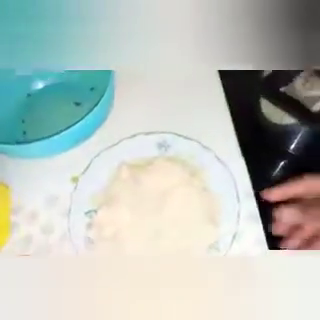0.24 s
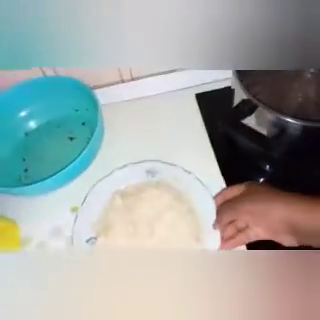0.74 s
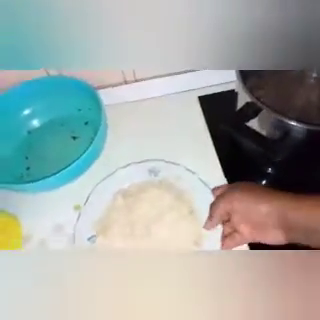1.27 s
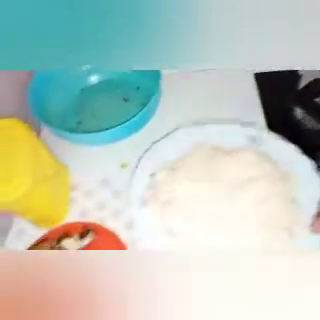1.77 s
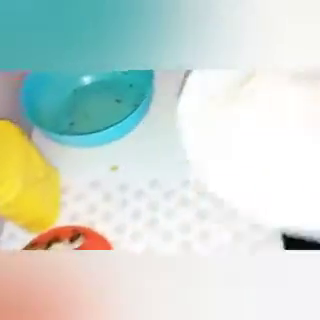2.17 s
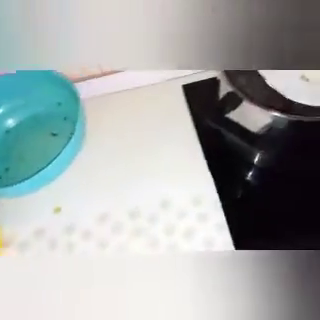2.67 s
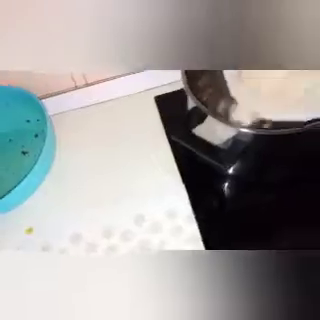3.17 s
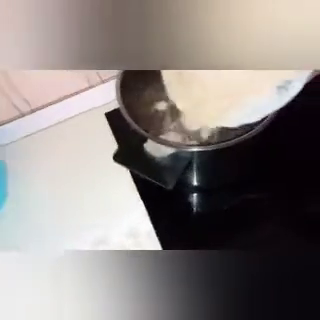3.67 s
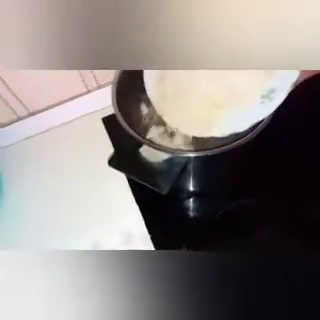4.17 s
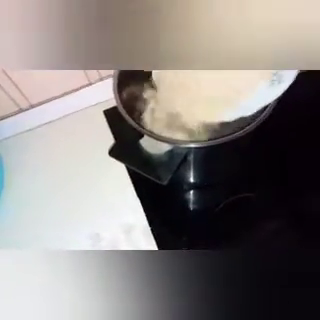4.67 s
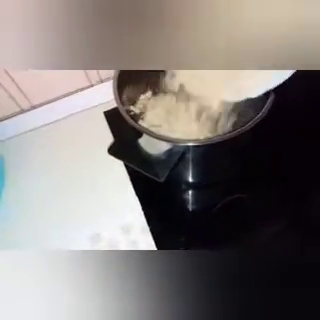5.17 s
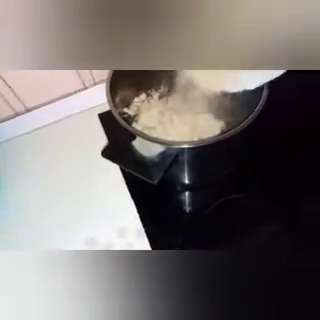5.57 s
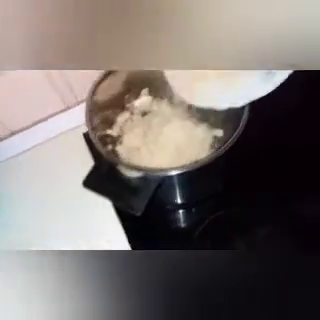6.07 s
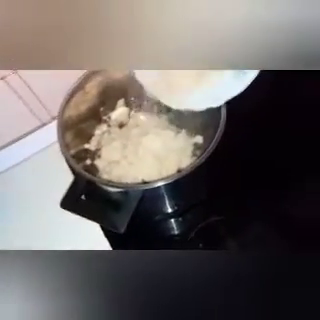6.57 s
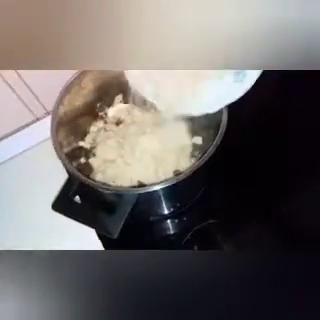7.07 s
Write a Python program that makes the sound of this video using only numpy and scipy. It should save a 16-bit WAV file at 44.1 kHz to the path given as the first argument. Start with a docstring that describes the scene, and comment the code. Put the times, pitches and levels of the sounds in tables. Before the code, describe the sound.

A steel pot simmers on a hob with a low rumble, soft gurgling, fizz and small crackles of fat, while single bubbles pop. After about three seconds a plate clinks sharply against the rim several times, drags along it in short hissing rubs, then knocks again in a quick uneven run. Each contact rings briefly over a dull thump. The sound is mono, with the short echo of a small kitchen.

```python
"""A small kitchen, where a steel pot simmers on a faintly humming hob. The simmer rumbles, gurgles
and fizzes; small bubbles ring, fat crackles and single bubbles burst. A plate of ground seed is held
over the pot and knocked and shaken against the rim: each chattering contact sets plate and pot
ringing, thumps the hob below and leaves a lingering noisy wash, while each shake drags the plate
along the rim with a hiss. Knocks, rubs and pops carry a short room tail."""
import sys
import numpy as np
from scipy import signal
from scipy.fft import rfft, irfft
from scipy.io import wavfile

SR = 44100
rng = np.random.default_rng(int(sys.argv[2]) if len(sys.argv) > 2 else 0)


def store_pcm(level_fs):
    """Save levels as 16-bit WAV."""
    pcm = np.round(np.clip(level_fs, -1, 1) * 32767).astype(np.int16)
    wavfile.write(sys.argv[1], SR, np.atleast_2d(pcm).T)


N = 323253

# tone of the simmer: f/Hz, level/dB
SIMMER_SPECTRUM = [(18, -62), (30, -19.5), (134, 13.5), (239, -8.5), (540, -11), (844, -19.5),
                   (1160, -18.5), (1590, -27.5), (1760, -23.5), (2230, -21.5), (4910, -21.5), (6720, -30),
                   (16000, -41.5)]
# air resonances in the hollow of the pot: f/Hz, rough width/Hz, level/dB
POT_AIR_MODES = [(97, 41, 2.5), (535.6, 20, -11), (698, 120, -19), (1133.4, 25, -15)]
# plate on rim: t/s, level/dB, plate pitch/Hz, then relative to that level pot ring/dB, plate ring/dB,
# hollow knock/dB, hob thump/dB; last, contact time/s
RIM_KNOCKS = [(2.996, 2.5, 3602, -17.5, -24.5, -16.5, -17.5, 0.0065),
              (3.179, -5.5, 3540, -12, -20, -12, -19, 0.012),
              (3.2, -9.5, 3640, -13, -22, -22, -17.5, 0.006),
              (3.37, -9, 3470, -15, -30, -11.5, -20.5, 0.013),
              (3.394, -3.5, 3535, -16, -26, -18, -19, 0.0019),
              (3.589, -19, 3420, -24, -19, -24, -12.5, 0.0058),
              (3.61, -4.5, 3700, -13, -30, -11.5, -20.5, 0.0054),
              (3.663, -13.5, 3640, -9, -21, -9, -14, .007),
              (3.753, -21, 3530, -10.5, -14.5, -15, -12.5, 0.011),
              (3.85, -4, 3730, -11, -14, -15.5, -20.5, 0.0064), (4.15, -32, 3690, -8, -11, -7, -10, 0.0053),
              (4.636, -35.5, 3670, 3, -12, 8, 3, 0.0047), (4.741, -26.5, 3550, -4.5, -13, -8, -12, .0041),
              (4.865, -30.5, 3370, -13, -25, -25, -9.5, 0.0096),
              (4.89, -32.5, 3560, -3, -20, -6, -9.5, 0.0038),
              (5.079, -25.5, 3590, -33, -18, -10, -8.5, .0073),
              (5.327, -16.5, 3475, -7.5, -19, -0.5, -13, 0.0028),
              (5.391, -33.5, 3660, -11, -16, -7, -10, 0.0086),
              (5.462, -12, 3540, -15, -15.5, -14, -16.5, 0.0072),
              (5.635, -13, 3380, -19, -34, -6, -17.5, 0.0071),
              (5.935, -8, 3730, -16.5, -32, -4, -16.5, 0.015),
              (5.961, -15.5, 3800, -14, -41, 1, -16, 0.0052), (5.984, -34, 3680, -23, -35, 11.5, 1, 0.0028),
              (6.103, -21.5, 3770, -7, -29, 2, -12, 0.0018),
              (6.169, -13.5, 3540, -20, -14.5, -22, -13, .009),
              (6.201, -14, 3660, -14.5, -26.5, 0.5, -17.5, 0.0019),
              (6.284, -25.5, 3750, -35, -23, -25, -38, 0.0048),
              (6.317, -10, 3660, -13.5, -18.5, -24.5, -15, 0.008),
              (6.404, -10, 3740, -17, -30, -5.5, -15.5, .0084),
              (6.464, -21, 3630, -7, -32, -2.5, -14, 0.0059),
              (6.505, -12, 3700, -16, -15.5, -18, -16.5, 0.009),
              (6.634, -2.5, 3755, -12.5, -34, -60, -18.5, 0.012),
              (6.881, -2, 3670, -22, -21.5, -17, -24, 0.012), (6.922, -17, 3400, -18, -22, -22, -14, 0.011),
              (7.202, -32, 3300, -19, -31, -26, -6, 0.005),
              (7.285, -30, 3800, -39, -28, -4.5, -6.5, 0.0041)]
# modes of plate, steel pot and hob: f/Hz, level/dB, t60/s
PLATE_MODES = [(1677, 5.5, 0.041), (2504, -2.5, 0.025), (3540, 8.5, 0.061), (4700, -2, 0.06),
               (5650, -43, 0.18), (7130, -7, 0.034)]
POT_MODES = [(751, -19, 0.21), (902.6, -7.5, 0.09), (1041, -6.5, 0.1), (1092, 8, 0.023),
             (1547, -8.5, 0.059), (1669, -5, 0.068), (2220, -20, 0.16), (2590, -4, 0.07),
             (2984, -13.5, 0.063), (4637, -4.5, 0.053), (5140, -14, 0.061), (6280, -13, 0.044),
             (6040, -19, 0.12), (7000, -41, 0.068), (7697, -11.5, 0.043), (8100, -11, 0.043),
             (8890, -14.5, 0.051), (10440, -19.5, 0.043), (12030, -27, 0.09), (13850, -24.5, 0.053)]
HOB_MODES = [(95.5, -3, 0.25), (140.4, -6, 0.19), (198, -8.5, 0.068), (292.8, -2, 0.1),
             (335.5, -22.5, 0.15), (403, -5, 0.098), (538.5, -9.5, 0.14)]


def from_db(db):
    """Decibels to gain."""
    return 10 ** (np.asarray(db) / 20)


def unit_rms(x):
    """Scale to rms 1."""
    return x / np.sqrt(np.mean(x ** 2) + 1e-20)


def unit_peak(x):
    """Scale to peak 1."""
    return x / np.max(np.abs(x))


def automation(points):
    """A breakpoint curve, sample by sample."""
    return np.interp(np.arange(N) / SR, *np.transpose(points))


def at_hz(points, hz):
    """Read a curve on a log-frequency axis."""
    freqs, values = np.transpose(points)
    return np.interp(np.log(hz), np.log(freqs), values)


def add(out, start_s, x):
    """Mix x in at its cue."""
    i = round(start_s * SR)
    out[i:i + len(x)] += x[:N - i]


def butter(x, order, hz, kind):
    """Butterworth filter."""
    return signal.sosfilt(signal.butter(order, hz, kind, fs=SR, output="sos"), x)


def equalise(x, spectrum):
    """Minimum-phase EQ, so nothing sounds ahead of an attack."""
    hz = np.maximum(np.arange(2049) * SR / 4096, 1)
    cepstrum = irfft(at_hz(spectrum, hz) * np.log(10) / 20)
    cepstrum[1:2048] *= 2
    cepstrum[2049:] = 0
    return signal.fftconvolve(x, irfft(np.exp(rfft(cepstrum))))[:len(x)]


def excite(response, x):
    """Play x through an impulse response scaled to unit energy."""
    return signal.fftconvolve(x, response / np.sqrt(np.sum(response ** 2)))[:N]


def drift(rate_hz):
    """Smooth random modulation of rms 1."""
    hop = 40
    pole = np.exp(-2 * np.pi * rate_hz * hop / SR)
    slow = signal.lfilter([1], [1, -2 * pole, pole * pole], rng.standard_normal(N // hop + 2002))[2000:]
    return np.interp(np.arange(N) / hop, np.arange(len(slow)), unit_rms(slow))


def grains(per_s, spread_db):
    """Random clicks of uneven size."""
    sizes = from_db(spread_db * np.minimum(rng.exponential(1, N), 4)) * rng.choice([-1, 1], N)
    return sizes * (rng.random(N) < per_s / SR)


def ring(x, hz, t60):
    """Resonator: a unit click starts a decaying sine of height 1."""
    r, w = from_db(-60 / (t60 * SR)), 2 * np.pi * hz / SR
    return signal.lfilter([0, np.sin(w)], [1, -2 * r * np.cos(w), r * r], x + 1e-18)


def struck(modes, scatter_db=0, tuning=1, rise_s=0.0009, t60_scale=1):
    """A body after one blow; every mode beats with a weaker neighbour on each side."""
    hz, db, t60 = np.transpose(modes)[:, :, None]
    t, out = np.arange(SR // 3) / SR, 0
    decay = 1000. ** (-t / (t60_scale * t60))
    for side in (-1, 0, 1):
        detune, phase, scatter = rng.standard_normal((3, *hz.shape))
        pitch = hz * tuning + 0.8 * np.sqrt(hz) * (side + 0.39 * detune)
        gain = from_db(db - 5.24 * abs(side) + scatter_db * scatter)
        out = out + np.sum(gain * decay * np.sin(2 * np.pi * pitch * t + 2 * phase), axis=0)
    return out * (1 - np.exp(-t / rise_s))


def kitchen_reverb(x):
    """The room's tail: noise that dies octave by octave, the highs first."""
    decay_times = [(100, 1), (500, 0.88), (2000, 0.79), (6000, 0.51), (14000, 0.29)]   # room decay: f/Hz, t60/s
    t, tail = np.arange(int(.8 * SR)) / SR, 0
    edges_hz = 40 * 2. ** np.arange(10)
    for low, high in zip(edges_hz, edges_hz[1:]):
        band = butter(rng.standard_normal(len(t)), 2, [low, high], "band")
        tail = tail + band * 1000. ** (-t / at_hz(decay_times, np.sqrt(low * high)))
    tail *= np.clip((t - .003) / 0.0066, 0, 1)   # pre-delay, then a quick fade-in
    return excite(tail, x)


def hob_hum(hz=50.3):
    """The hob hums on one low sine."""
    return np.sin(2 * np.pi * hz * np.arange(N) / SR)


def knock_tail_power(rise_s=0.049, fall_s=0.12):
    """A power envelope that swells and lingers after each knock, bigger for harder knocks."""
    out, t = np.zeros(N), np.arange(SR) / SR
    swell = (1 - np.exp(-t / rise_s)) * np.exp(-t / fall_s)
    for start_s, db, *_ in RIM_KNOCKS:
        add(out, start_s, (from_db(0.62 * db) * swell) ** 2)
    return out


def simmer():
    """Rumble, gurgle in the hollow of the pot and fizz; the same noise swells as a tail to each knock."""
    vigour = [(0, -46), (.3, -48.5), (.8, -46), (1.3, -48.5), (1.9, -54), (2.4, -55), (3, -51), (4.2, -46),
              (4.9, -44), (5.4, -55), (5.9, -52.5), (6.5, -50.5), (7.15, -52), (7.33, -51)]   # how hard the pot simmers: t/s, level/dB
    # rumble, gurgle, fizz: level over the vigour/dB, factor on its swing, knock tail/dB
    band_mix = [(1, 0.95, -39.5), (0, 1.21, -37.5), (-8, 0.73, -38)]
    wash = equalise(rng.standard_normal(N), SIMMER_SPECTRUM)
    stirred_air = rng.standard_normal(N) * from_db(3.8 * drift(41))
    hollow = sum(from_db(db) * unit_rms(ring(stirred_air, hz, 2.6 / width))
                 for hz, width, db in POT_AIR_MODES)
    bed = unit_rms(wash) + from_db(-3) * unit_rms(hollow)
    rumble = butter(bed, 3, 270, "low")
    gurgle = butter(bed, 2, [270, 1600], "band")
    fizz = butter(bed, 3, 1600, "high")
    bursts_db = 1.24 * drift(42)   # the boil comes in small bursts
    centre_db, tail_power, out = -50, knock_tail_power(), 0
    swing_db = automation(vigour) - centre_db
    for band, (db, depth, tail_db) in zip([rumble, gurgle, fizz], band_mix):
        power = from_db(centre_db + db + depth * swing_db) ** 2 + from_db(tail_db) ** 2 * tail_power
        flutter_db = bursts_db + 1.4 * drift(12.7) + 1.86 * drift(12)
        out = out + unit_rms(band) * np.sqrt(power) * from_db(flutter_db)
    return out


def bubbling():
    """Small bubbles of all sizes ring briefly; spits of fat crackle in clumps."""
    fader = [(0, -54.5), (.9, -58), (1.6, -58), (2.4, -64), (3, -65), (4.5, -57), (6, -56), (7.33, -68)]   # bubbles and crackle together: t/s, level/dB
    births = grains(per_s=230, spread_db=3.5)
    pitch_slot = rng.integers(0, 24, N)
    bubbles = sum(ring(ring(births * (pitch_slot == k), hz, 39 / hz), hz, 5.8 / hz) / SR * hz
                  for k, hz in enumerate(np.geomspace(1600, 11000, 24)))
    spits = grains(per_s=650 * from_db(4.3 * drift(31)), spread_db=5.7)
    crackle = sum(ring(spits * (pitch_slot == k), hz, 2 / hz)
                  for k, hz in enumerate(np.geomspace(1700, 13000, 24)))
    bubbles = unit_rms(equalise(bubbles, SIMMER_SPECTRUM))
    crackle = unit_rms(equalise(crackle, SIMMER_SPECTRUM))
    return from_db(automation(fader)) * (bubbles + from_db(-1.5) * crackle)


def bubble_pops(t60=0.043):
    """A bubble bursts: a pitched puff, a bright spray, and the hollow of the pot answering."""
    # bursting bubbles: t/s, puff peak/dB, f/Hz, then relative to the puff spray/dB, hollow/dB
    pops = [(0.0961, -41.5, 2450, -22, 2), (0.1507, -32.5, 1460, -31, -9), (0.246, -30, 2290, -18, -20),
            (0.288, -37, 3500, -3.5, -13), (0.402, -33.5, 3060, -14, -13), (0.4353, -38.5, 1680, -15, -7),
            (0.5853, -38, 2960, -39, -6), (0.6653, -31, 4730, 0.5, -7), (0.818, -45.5, 1400, -26, 9),
            (0.8878, -34.5, 3540, -11, -23), (0.9296, -31.5, 2730, -11.5, -30),
            (0.9817, -32, 2030, -16, -8), (1.059, -39, 4940, -25, -36), (1.1788, -39, 3930, -20, -21),
            (1.2216, -54, 6000, 10, -37), (1.3548, -45, 2120, -8, 2), (1.443, -44.5, 2740, -2.5, 2),
            (1.5144, -39.5, 3300, -20, -7), (1.6272, -41.5, 4700, -6, 8), (1.7383, -46, 4470, -1.5, 4),
            (1.866, -51, 5040, 3.5, -29), (1.9948, -35.5, 2230, -15, -25), (2.0866, -35, 2590, 5, -42),
            (2.3402, -36, 4560, -28, -11), (2.454, -46.5, 5100, -28, -28)]
    out, t = np.zeros(N), np.arange(SR // 10) / SR
    for start_s, db, hz, spray_db, hollow_db in pops:
        burst = rng.standard_normal(len(t)) * 1000. ** (-t / t60) * np.minimum(t / .002, 1)
        puff = ring(ring(burst, hz, 8.6 / hz), hz, 3.4 / hz)
        spray = butter(burst, 2, [4500, 11000], "band")
        hollow = ring(burst, POT_AIR_MODES[-1][0], t60=0.027)
        for layer, layer_db in (puff, 0), (spray, spray_db), (hollow, hollow_db):
            add(out, start_s, from_db(db + layer_db) * unit_peak(layer))
    return out


def plate_rubs():
    """The plate's foot drags along the rim: dense slips hiss and ring pot and plate; the hob thumps."""
    # shakes of the plate: centre t/s, level/dB, length/s, then relative to that level thump/dB, sheen/dB
    shakes = [(2.831, -50, 0.08, 6.5, -17), (3.844, -42.5, 0.08, 5, -25), (3.993, -40, 0.11, -8.5, -17),
              (4.185, -45, 0.074, 4, -20), (4.24, -43.5, 0.056, 5.5, -14), (4.317, -52, 0.061, 11, -12),
              (4.39, -39.5, .12, 3, -9.5), (4.519, -34, 0.077, -8, -12), (4.596, -48.5, 0.051, 5, -18),
              (4.66, -41, 0.089, 3.5, -20), (4.771, -37, 0.087, 2, -27), (4.91, -43.5, 0.13, -3, -23),
              (4.987, -37.5, 0.1, -3.5, -22), (5.045, -51.5, 0.11, -6, -1), (5.102, -49, 0.19, 0, -4),
              (5.199, -49.5, 0.11, -13, -9), (5.281, -42, 0.17, -8, -10), (6.502, -39, 0.079, -1, -5),
              (7.24, -42.5, 0.095, -1.5, -5), (7.3, -45, 0.071, -7, -17)]
    hiss_spectrum = [(180, -44), (300, -31), (546, 5.5), (689, -7), (1100, 2.5), (1340, -12.5), (1640, 2),
                     (2100, -7.5), (4670, -10.5), (16000, -31)]   # tone of the friction: f/Hz, level/dB
    t = np.arange(N) / SR
    tremble = from_db(-39.5) * np.sqrt(knock_tail_power())   # after a knock the plate trembles on the rim
    drag, press, skim = np.zeros(N), np.zeros(N), from_db(-9) * tremble
    for centre_s, db, length_s, thump_db, sheen_db in shakes:
        swell = from_db(db) * np.cos(np.pi * np.clip((t - centre_s) / length_s, -.5, .5)) ** 2
        drag += swell
        press += from_db(thump_db) * swell
        skim += from_db(sheen_db) * swell
    slips = unit_rms(grains(per_s=4000, spread_db=1.9) * from_db(4 * drift(34)))
    bodies = struck(POT_MODES) + from_db(-10.5) * struck(PLATE_MODES)
    softened = signal.lfilter([1], [1, -0.37], bodies)   # gentle treble roll-off
    ringing = excite(softened, (from_db(0.5) * drag + tremble) * slips)
    sheen = excite(butter(bodies, 3, 3500, "high"), skim * slips)
    pressure = press * rng.standard_normal(N)
    thump = excite(struck(HOB_MODES), pressure)
    hiss = from_db(-2) * drag * unit_rms(equalise(slips, hiss_spectrum))
    return hiss + thump + ringing + sheen


def plate_knocks():
    """Milliseconds of chattering contact crack, ring plate, pot and hob, and give the plate a short hollow
    thud."""
    crack_spectrum = [(180, -39), (300, -0.5), (667, -22.5), (1640, -6), (3030, -13), (3580, -7),
                      (4160, -16.5), (4520, -13), (5900, -11.5), (16000, -34)]   # tone of the contact: f/Hz, level/dB
    out, t = np.zeros(N), np.arange(SR // 20) / SR
    for start_s, db, plate_hz, pot_db, plate_db, hollow_db, thump_db, contact_s in RIM_KNOCKS:
        chatter = rng.standard_normal(len(t)) * np.exp(-t / contact_s) * np.minimum(t / .002, 1)
        # a hard touch reaches the high modes; a flat landing sounds hollow and dull
        db_per_octave = min(-1 - 0.1 * hollow_db, 1)
        pot_modes = [(hz, level + db_per_octave * np.log2(hz / 1000), t60) for hz, level, t60 in POT_MODES]
        plate_modes = np.array(PLATE_MODES)
        plate_modes[0, 1] += -17 - plate_db   # the lowest mode follows the knock's level alone
        tuning = plate_hz / PLATE_MODES[2][0]   # an emptier plate rings higher
        pot = struck(pot_modes, scatter_db=0.13)
        plate = struck(plate_modes, scatter_db=0.81, tuning=tuning, t60_scale=0.96)   # the grip damps it
        thump = struck(HOB_MODES, scatter_db=0.45, rise_s=0.0032)
        crack = unit_peak(equalise(chatter, crack_spectrum))
        hollow = unit_peak(ring(chatter, hz=1200, t60=0.012))
        layers = (pot, pot_db), (plate, plate_db), (thump, thump_db), (crack, -4.5), (hollow, hollow_db)
        for layer, layer_db in layers:
            add(out, start_s, from_db(db + layer_db) * layer)
    return out


def scene():
    """Knocks, rubs and pops with their room tail over a dry bed; one microphone feeds both channels."""
    hits = plate_knocks() + plate_rubs() + bubble_pops()
    room = from_db(-13.5) * kitchen_reverb(hits)
    mono = hits + room + simmer() + bubbling() + from_db(-64) * hob_hum()
    return np.array([mono, mono])


def record(dry):
    """The microphone loses the deepest bass, rounds its peaks and cuts the top."""
    low_cut = butter(dry, 4, 55, "high")
    rounded = 1.2 * np.tanh(low_cut / 1.2)
    return signal.sosfilt(signal.cheby2(12, 60, 16600, fs=SR, output="sos"), rounded)


dry = scene()
out = record(dry)
store_pcm(out)
```